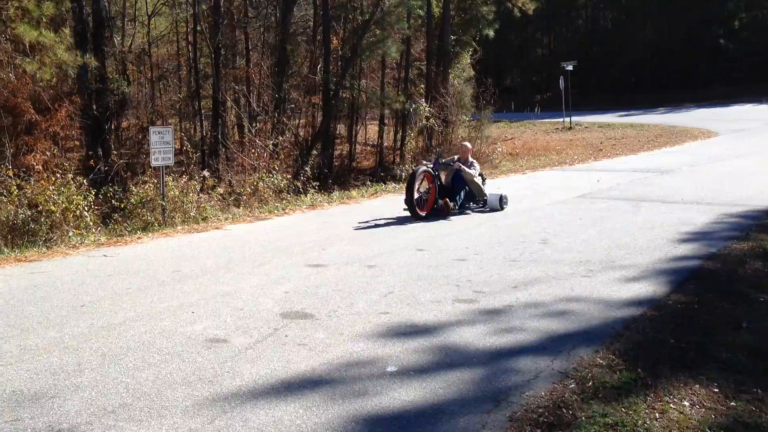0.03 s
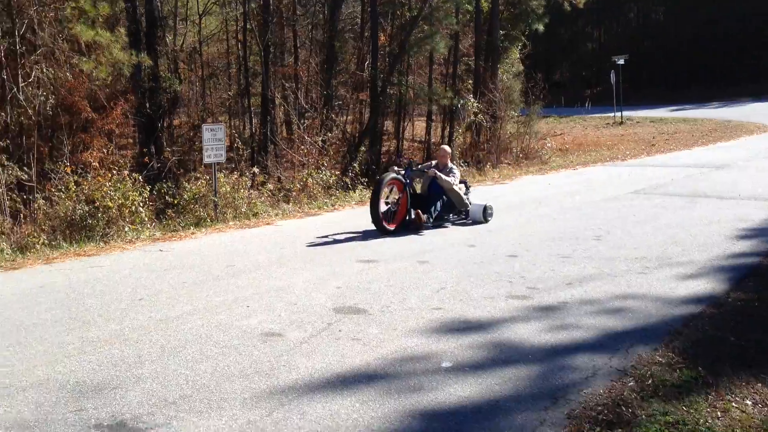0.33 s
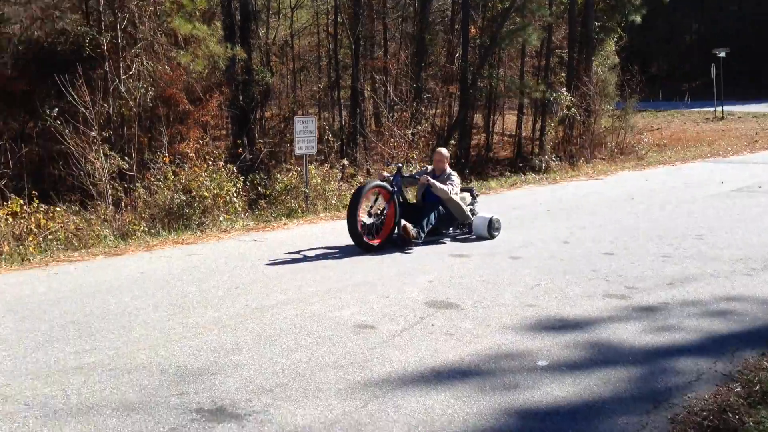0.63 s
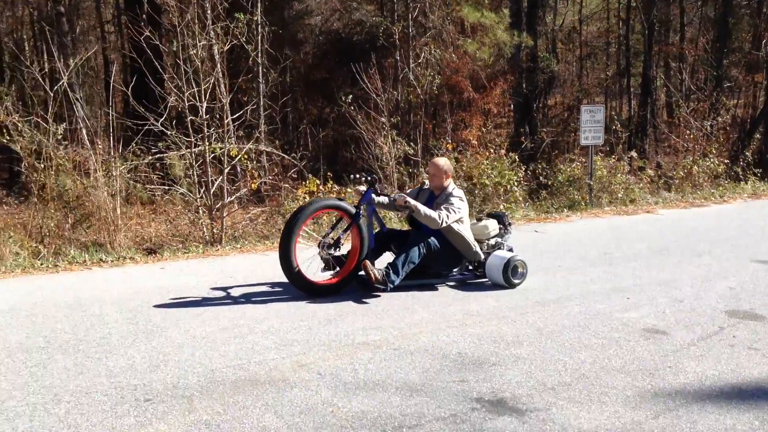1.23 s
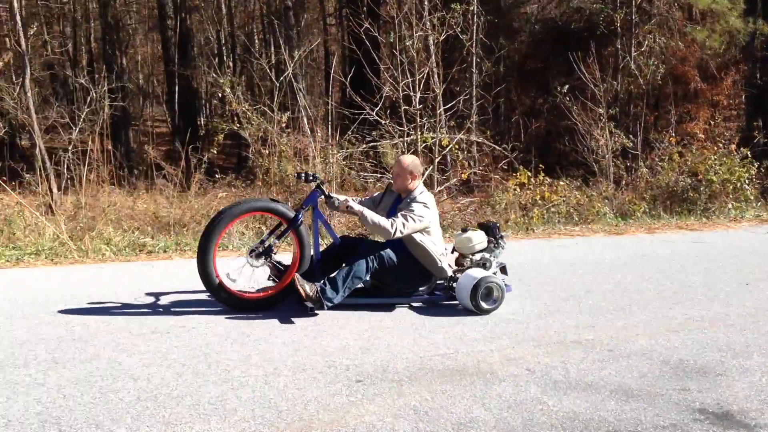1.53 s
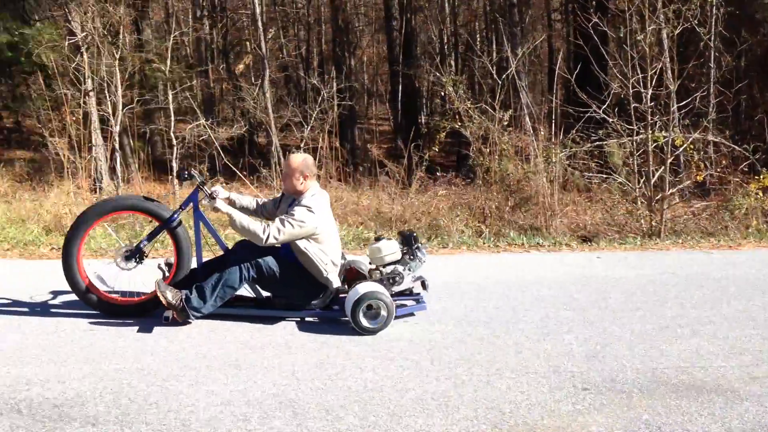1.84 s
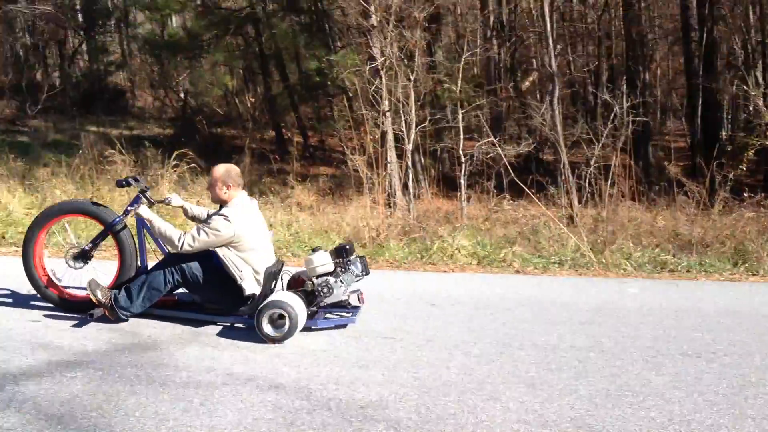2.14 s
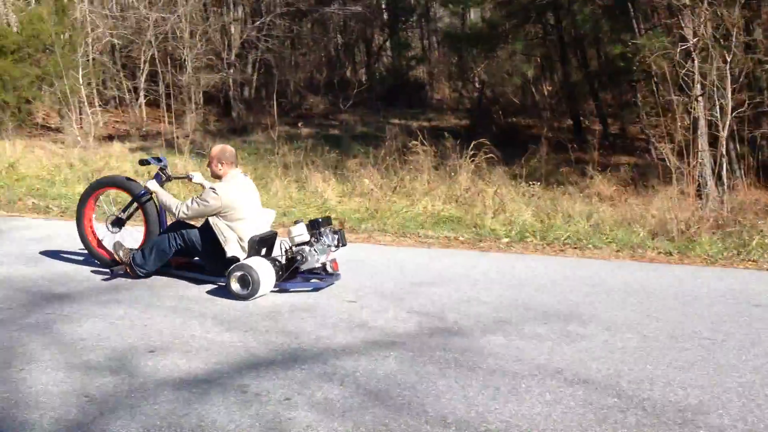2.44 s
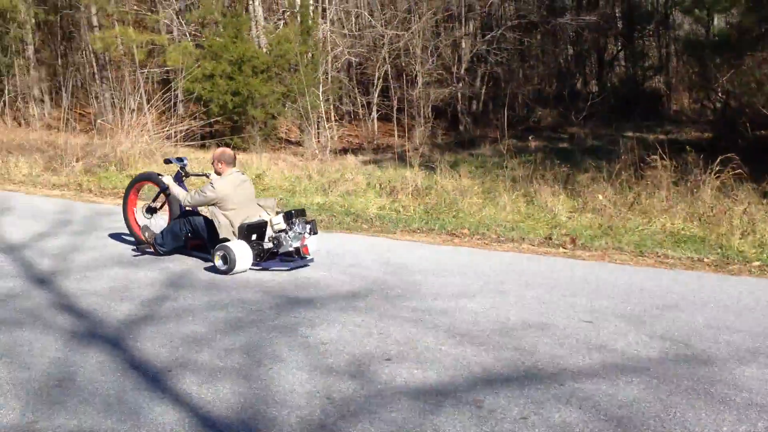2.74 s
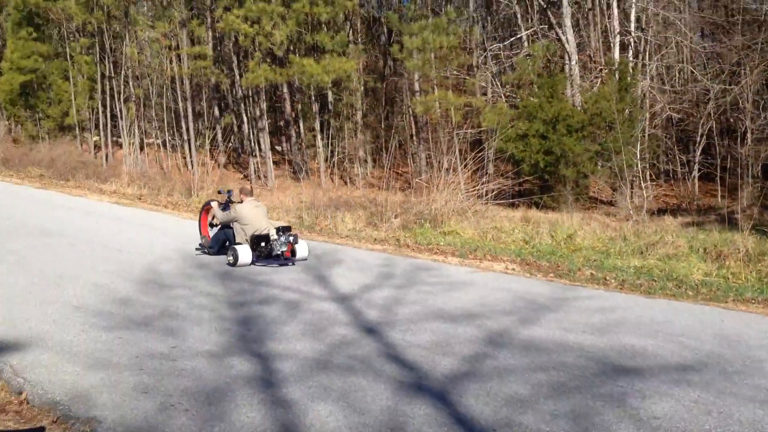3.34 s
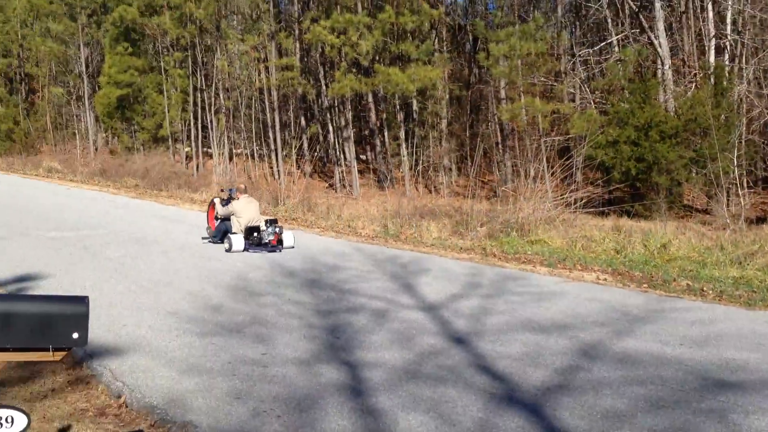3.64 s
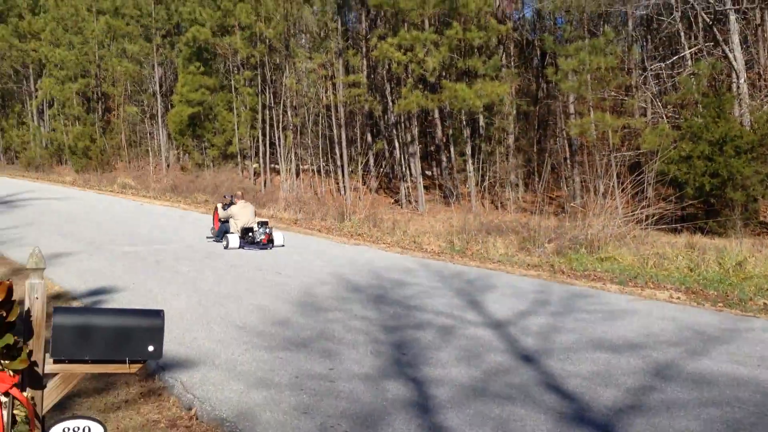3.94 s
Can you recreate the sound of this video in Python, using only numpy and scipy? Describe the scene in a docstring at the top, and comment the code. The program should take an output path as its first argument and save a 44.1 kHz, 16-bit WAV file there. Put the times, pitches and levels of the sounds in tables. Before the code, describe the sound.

A motorized trike putters closer on a road, then passes with a louder, chuffing exhaust.

```python
"""Drift trike passing by the woods

One microphone beside an asphalt road, trees giving a soft echo. A drift trike with a small
single-cylinder four-stroke comes up at low throttle, valve gear clattering, slack chain clacking and
plastic rear wheels hissing. As it goes by the throttle opens and the exhaust faces the microphone:
one sharp chuff and boom per firing."""
import sys
import numpy as np
from scipy import signal
from scipy.fft import rfft, irfft, next_fast_len
from scipy.io import wavfile
from scipy.ndimage import uniform_filter1d, map_coordinates

SR = 44100
rng = np.random.default_rng(int(sys.argv[2]) if len(sys.argv) > 2 else 0)


def generate_wav(sig):
    """Save sig (samples, or channels by samples) to the path in sys.argv[1] as 16-bit PCM at SR."""
    pcm = np.round(np.clip(np.atleast_2d(sig).T, -1, 1) * 32767).astype(np.int16)
    wavfile.write(sys.argv[1], SR, pcm)


N = 176400

# The pass from the roadside. Each row: time in seconds, relative levels of clatter and wheel hiss in dB.
PASS_LEVELS = [(.15, -41.5, -47.5), (.65, -39, -44.5), (.95, -39, -39), (1.2, -33.5, -36),
               (1.75, -32, -30.5), (2.1, -33, -31), (2.5, -28.5, -21), (2.95, -32.5, -23),
               (3.4, -31.5, -27), (4, -36, -34.5)]


def exhaust():
    """Every firing booms in the pipe, rings the muffler and lets out a chuff of gas; a few crack."""
    # Each row: time in seconds, pipe boom in dB, muffler ring in dB.
    levels = [(.15, -43.5, -68), (.6, -46, -61), (1.35, -44, -62), (1.8, -36, -63), (2.15, -38.5, -49),
              (2.35, -35, -39.5), (2.6, -34, -37.5), (3.05, -37.5, -38.5), (3.45, -37.5, -43),
              (4, -43, -48)]
    # The firing pulse and two intake gulps later in the cycle. Each row: delay in cycles, level in dB.
    thumps = [(0, 0.5), (0.17, -7), (0.344, -4.5)]
    # Pipe from the front, pipe from the rear, muffler. Each row: resonance in Hz, width in Hz, gain in dB.
    pipe_ahead = [(138, 10, -13), (178.7, 33, 7), (244, 17, -15), (277, 11, -8)]
    pipe_behind = [(136, 22, -0.5), (151.6, 16, 1), (193, 17, 1), (233.7, 14, -1.5), (311, 15, -13)]
    muffler = [(411, 6.2, -5.5), (432, 29, -7), (484, 19.6, 1), (545, 4.3, -15)]
    # Escaping gas and single hard firings. Each row: time in seconds, relative level in dB.
    chuff_levels = [(.5, -57), (1.2, -39.5), (2.15, -40.5), (2.38, -29.5), (2.85, -29.5), (3.22, -32),
                    (3.33, -36), (3.47, -34.5), (3.68, -37), (3.76, -43.5), (4, -40)]
    hard_firings = [(2.392, -24), (2.822, -17), (2.900, -23), (3.244, -23), (3.432, -25)]
    # Each row: frequency in Hz, level in dB.
    gas_spectrum = [(300, 4), (1100, -15), (1900, 0), (2300, -9.5), (3000, 0), (3500, 2.5), (4600, 6.5),
                    (5150, -12.5), (6000, -4), (7700, 1.5), (9500, 2), (11300, -2.5), (12500, -17),
                    (15500, 0.5)]
    boom_db, muffler_db = curves(levels)
    rear = behind()
    pulses = strokes(lag=-.03, scatter_db=.7, jitter_s=.00005)
    waves = sum(amp(db) * strokes(lag - .03, scatter_db=.8, jitter_s=.00006) for lag, db in thumps)
    boom = np.sqrt(1 - rear) * ring(waves, pipe_ahead) + np.sqrt(rear) * ring(waves, pipe_behind)
    firings = strokes(lag=-.02, scatter_db=1.2, jitter_s=.0003)
    gas = bursts(firings, rise_s=.0026, fall_s=.0038) * amp(1.2 * wobble(1500))
    times, crack_db = np.transpose(hard_firings)
    cracks = bursts(impulses(times, amp(crack_db - 4.5)), rise_s=.00095, fall_s=.0024)
    rush = shifting(coloured(rng.standard_normal(N), gas_spectrum), depth_db=3.0)
    chuff = (amp(curves(chuff_levels)[0]) * unit(gas) + cracks) * rush
    return amp(boom_db) * boom + amp(muffler_db) * ring(pulses, muffler) + chuff


def wheels():
    """Hard rear wheels and chain hiss in fine grains, shaken by the engine; the swish is highest abreast."""
    # Hiss coming and going. Each row: frequency in Hz, level in dB.
    hiss_ahead = [(3000, -32), (5100, -8), (5800, 2), (7600, -1.5), (8700, 4.5), (11300, 3), (12400, -2.5),
                  (13800, 6), (15000, -10)]
    hiss_behind = [(3000, -13), (5100, -6), (5900, 2), (6600, -7), (7700, 4), (9000, 1), (10200, 2),
                   (11300, -1), (12400, -5), (13800, -2), (15000, -9)]
    # Each row: time in seconds, centre of the swish in Hz.
    swish_pitch = [(1.25, 8750), (1.75, 10150), (2.2, 10000), (2.6, 8900), (3, 8100)]
    swish_width_hz = 620
    _, hiss_db = curves(PASS_LEVELS)
    rear = behind()
    shake = unit(bursts(knocks(), rise_s=.0013, fall_s=.0086))
    grit = (1.7 + shake) * amp(1.3 * wobble(1200) + .46 * wobble(30.13)) * rng.standard_normal(N)
    hiss = (1 - rear) * coloured(grit, hiss_ahead) + amp(-7) * rear * coloured(grit, hiss_behind)
    band = filtered(grit, lambda hz: np.exp(-(hz / swish_width_hz) ** 2 / 2))
    swish = unit(band * np.sin(2 * np.pi * np.cumsum(curves(swish_pitch)[0]) / SR))
    return amp(hiss_db - 1) * shifting(hiss + amp(-7.5 - 10 * rear) * swish, depth_db=1.4)


def machinery():
    """Valves and piston clatter within each cycle; block and frame rumble with them."""
    # Each row: frequency in Hz, level in dB.
    clatter_spectrum = [(500, -12.5), (860, -6.5), (1080, 3.5), (1600, 0.5), (2000, 1.5), (2200, -4.5),
                        (2750, 1), (3500, 0.5), (4200, -0.5), (4700, 1), (5100, -9), (8000, -9.5),
                        (15000, -18.5)]
    block_spectrum = [(25, -7), (60, -18), (100, -8), (170, 3.5), (290, 3), (375, -7.5), (480, 1),
                      (700, -0.5), (850, -9), (1100, -3.5), (1600, -34)]
    # Each row: time in seconds, relative level in dB.
    rumble_levels = [(.15, -44), (1, -39.5), (1.7, -36.5), (2.7, -36.5), (3.2, -36), (4, -44)]
    clatter_db = curves(PASS_LEVELS)[0] - .48 - 2.73 * behind()
    knocking = unit(bursts(knocks(), rise_s=.0019, fall_s=.0062))
    rattle = (1.7 + knocking) * amp(.79 * wobble(900)) * rng.standard_normal(N)
    clatter = coloured(rattle, clatter_spectrum)
    rumble = coloured((13 + knocking) * rng.standard_normal(N), block_spectrum)
    return amp(clatter_db) * clatter + amp(curves(rumble_levels)[0] + .5) * rumble


def chain():
    """The slack chain clacks against sprocket and frame on the approach, while the throttle is low."""
    # Each row: time in seconds, level in dB, treble against middle in dB.
    clacks = [(.184, -29, -9), (0.208, -24, -19), (0.297, -21.5, -25), (.330, -19.5, -1.5),
              (.401, -19, -7.5), (.694, -16.5, -2), (.748, -24, 0), (0.792, -26, -1), (0.833, -18, 4),
              (1.025, -14.5, -14), (1.163, -16.5, -15), (1.504, -17, 3), (1.641, -19, -20),
              (1.902, -15.5, -1.5)]
    # The two bands of a clack. Each row: frequency in Hz, level in dB.
    middle = [(600, -2), (1500, -6), (3300, 11), (4600, 1), (6000, -4), (15000, -21)]
    treble = [(3000, -34), (6000, -3), (9000, 20), (15000, 6)]
    times, level_db, treble_db = np.transpose(clacks)
    treble_share = np.clip(amp(treble_db) ** 2, .01, .9)
    out = 0
    for share, spectrum in (1 - treble_share, middle), (treble_share, treble):
        hits = impulses(times, amp(level_db) * np.sqrt(share))
        out += bursts(hits, rise_s=.000094, fall_s=.00084) * coloured(rng.standard_normal(N), spectrum)
    return out


def sprocket():
    """The chain whines as it meshes, swaying with the crank's speed and surging at each turn."""
    # Each row: time in seconds, relative level in dB.
    whine_levels = [(.15, -48), (1, -44.5), (1.35, -41), (1.7, -50), (2.2, -44), (2.55, -31), (2.85, -38.5),
                    (3.3, -36.5), (3.78, -32), (4, -33.5)]
    teeth_per_cycle, sway_rad = 24, .81
    cycles = crank()
    sway = sway_rad * np.sin(2 * np.pi * (cycles - .25))
    phase = 2 * np.pi * teeth_per_cycle * cycles + sway + .28 * wobble(70)
    surge = amp(2 * np.cos(4 * np.pi * (cycles - .08)) + 1.5 * wobble(40))
    return amp(curves(whine_levels)[0] - 3) * unit(surge * np.sin(phase))


def fins():
    """Tappet and firing ring the cooling fins and shroud, each mode wavering; two of the chain's clacks ring
    them too."""
    # Each row: resonance in Hz, width in Hz, gain in dB.
    modes = [(3442, 110, 7.5), (3560, 120, -1), (3706, 110, -3), (3910, 54, 5), (4214, 300, 0),
             (4650, 48, -0.5)]
    # Running ring, and the fin ring of two chain clacks against the frame. Each row: time in seconds, level in
    # dB.
    ring_levels = [(.6, -58), (2.2, -47), (2.5, -38.5), (2.8, -34), (3.22, -35), (3.45, -49), (4, -45)]
    clack_rings = [(1.025, -18), (1.642, -16)]
    tappet = strokes(lag=-.21, scatter_db=3, jitter_s=.0005)
    firings = strokes(lag=-.03, scatter_db=3, jitter_s=.001)
    blows = .9 + unit(bursts(tappet + 1.4 * firings, rise_s=.00036, fall_s=.0019))
    ringing = sum(amp(db + 1.6 * wobble(20)) * ring(blows * rng.standard_normal(N), [(hz, width, 0)])
                  for hz, width, db in modes)
    times, clink_db = np.transpose(clack_rings)
    clinks = ring(impulses(times, amp(clink_db)), modes)
    clinks *= amp(clink_db.max()) / np.abs(clinks).max()
    return amp(curves(ring_levels)[0]) * unit(ringing) + clinks


def pipe_hum():
    """The pipe holds a few clean overtones of the firing rate."""
    # Each row: time in seconds, level in dB.
    levels = [(.15, -49.5), (1.2, -50.5), (1.9, -44), (2.35, -36.5), (2.8, -39.5), (3.3, -44.5), (4, -51)]
    # Each row: multiple of the firing rate, relative level in dB.
    overtones = [(8, -5), (9, 0), (15, -9), (19, -7)]
    phase = 2 * np.pi * crank()
    tone = sum(amp(db) * np.sin(k * phase + rng.uniform(0, 2 * np.pi)) for k, db in overtones)
    return amp(curves(levels)[0]) * unit(tone)


def intake():
    """The intake tract rings as its valve closes; its mouth honks on passing the microphone."""
    # Each row: resonance in Hz, width in Hz, gain in dB.
    tract = [(637.4, 26, 10.5), (1030, 53, 4)]
    mouth = [(654, 25, -1), (708, 20, 5)]
    nearest_s, spread_s = 1.74, .45
    closings = strokes(lag=.53, scatter_db=4, jitter_s=.00018)
    gulps = strokes(lag=-.13, scatter_db=2, jitter_s=.0001)
    facing = np.exp(-((np.arange(N) / SR - nearest_s) / spread_s) ** 2)
    honk = amp(-41.5) * facing * ring(gulps, mouth)
    return amp(curves(PASS_LEVELS)[0] - 14.5) * ring(closings, tract) + honk


def woods(x):
    """The tree trunks scatter back a soft tail, 20 ms behind the direct sound."""
    # Each row: frequency in Hz, seconds to die away by 60 dB.
    decay = [(150, 0.36), (2000, 0.44), (12000, 0.08)]
    hz, t, noise = signal.stft(rng.standard_normal(SR // 2), SR, nperseg=256)
    tail = signal.istft(noise * amp(-60 * t / along(decay, hz)[:, None]), SR, nperseg=256)[1]
    return signal.fftconvolve(np.pad(x, (SR // 50, 0)), tail / np.linalg.norm(tail))[:N]


def crank():
    """Engine cycles counted from an opening of the exhaust valve."""
    # Each row: time in seconds, firings per second.
    firing_rate = [(0, 19.9), (.8, 20.2), (1.2, 20.88), (1.6, 22.05), (1.9, 22.46), (2.2, 22.44),
                   (2.35, 23.76), (2.55, 25.67), (2.7, 26.03), (2.95, 25.78), (3.25, 26.52), (3.6, 26.87),
                   (4, 27.03)]
    exhaust_opens_s = 2.9003
    cycles = np.cumsum(curves(firing_rate)[0]) / SR
    return cycles - np.interp(exhaust_opens_s, np.arange(N) / SR, cycles)


def strokes(lag, scatter_db, jitter_s):
    """One impulse per engine cycle, lag of a cycle after the exhaust valve opens."""
    cycles = crank()
    count = np.arange(np.floor(cycles[0]), np.ceil(cycles[-1]))
    late, size = rng.standard_normal((len(count), 2)).T
    times = np.interp(count + lag, cycles, np.arange(N) / SR, left=-1, right=-1) + jitter_s * late
    heard = (times >= 0) & (times < N / SR)
    return impulses(times[heard], amp(scatter_db * size)[heard])


def knocks():
    """The impulses of valves and piston within each cycle."""
    # Each row: lag in cycles, level in dB.
    pattern = [(0.019, 0.5), (0.202, 3), (0.498, -6.5), (0.802, -1)]
    return sum(amp(db) * strokes(lag, scatter_db=2.5, jitter_s=.0021) for lag, db in pattern)


def behind():
    """0 while the trike approaches, 1 once its tail faces the microphone."""
    turn_s, swing_s = 2.33, .12
    return .5 + .5 * np.tanh((np.arange(N) / SR - turn_s) / swing_s)


def amp(db):
    """Decibels to gain."""
    return 10 ** (np.asarray(db) / 20)


def unit(x):
    """Scale to rms 1."""
    return x / np.sqrt(np.mean(x ** 2) + 1e-20)


def along(points, hz):
    """Interpolate (Hz, value) points on a log axis."""
    f, v = np.transpose(points)
    return np.interp(np.log(hz + 1), np.log(f + 1), v)


def curves(rows):
    """One value per sample for each column after the time."""
    times, *columns = np.transpose(rows)
    return [np.interp(np.arange(N) / SR, times, c) for c in columns]


def wobble(rate):
    """A smooth random curve, rate knots a second."""
    return map_coordinates(rng.standard_normal(N // 8), [np.arange(N) * rate / SR], order=3)


def impulses(times, gains):
    """An impulse at each time in seconds."""
    return np.bincount((times * SR).astype(int), gains, N)


def bursts(hits, rise_s, fall_s):
    """An envelope that swells into each impulse and dies after it."""
    t = np.arange(-(SR // 20), SR // 20 + 1) / SR
    return signal.fftconvolve(hits, np.exp(-np.maximum(-t / rise_s, t / fall_s)), 'same')


def filtered(x, response):
    """x through a frequency response."""
    m = next_fast_len(N + SR // 2)
    return irfft(rfft(x, m) * response(np.fft.rfftfreq(m, 1 / SR)), m)[:N]


def coloured(x, spectrum):
    """x through a spectrum, at rms 1."""
    return unit(filtered(x, lambda hz: amp(along(spectrum, hz))))


def ring(x, modes):
    """x through a set of resonances, at rms 1."""
    return unit(filtered(x, lambda f: sum(amp(db) * 1j * f * width / (hz * hz - f * f + 1j * f * width)
                                          for hz, width, db in modes)))


def shifting(x, depth_db):
    """x with patches of its spectrum swelling and fading at random."""
    z = signal.stft(x, nperseg=256)[2]
    bands = uniform_filter1d(rng.standard_normal(z.shape), size=5, axis=0)
    patches = uniform_filter1d(bands, size=12, axis=1)
    return signal.istft(z * amp(depth_db * unit(patches)), nperseg=256)[1][:N]


def scene():
    """The trike and its echo from the woods, in mono."""
    trike = exhaust() + pipe_hum() + intake() + machinery() + fins() + sprocket() + wheels() + chain()
    return (trike + amp(-15) * woods(trike))[None]


def record(dry):
    """The sound swells in just after the start; the microphone sheds the deep bass and the highest treble."""
    open_s, low_cut_hz, top_hz = .095, 105, 15400
    opening = np.clip((np.arange(N) / SR - open_s) / .013 + 1, 0, 1)
    low_cut = signal.butter(3, low_cut_hz, 'high', fs=SR, output='sos')
    thin = signal.sosfilt(low_cut, dry[0] * opening ** 2)
    return filtered(thin, lambda hz: 1 / (1 + (hz / top_hz) ** 200))[None]


dry = scene()
out = record(dry)
generate_wav(out)
```